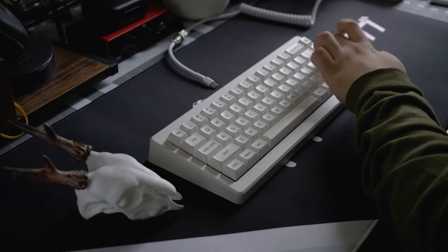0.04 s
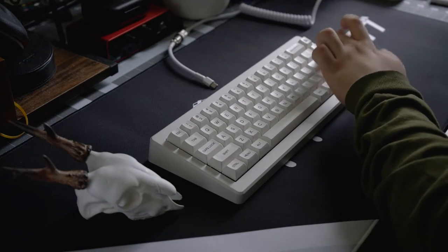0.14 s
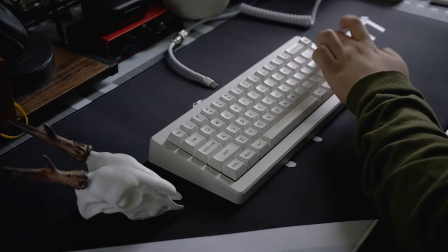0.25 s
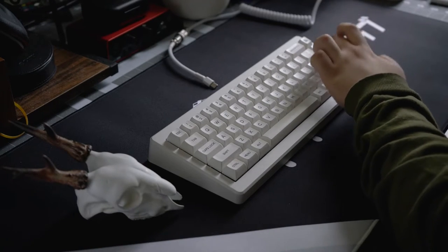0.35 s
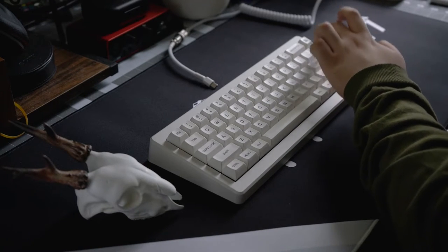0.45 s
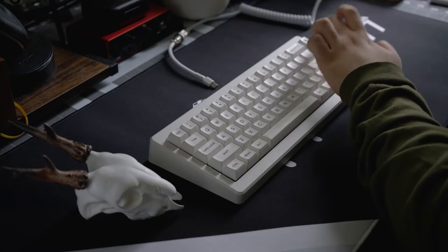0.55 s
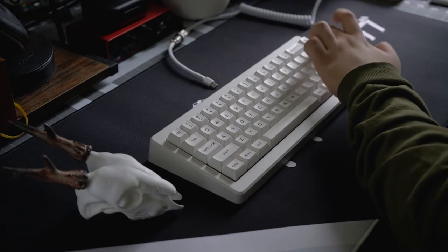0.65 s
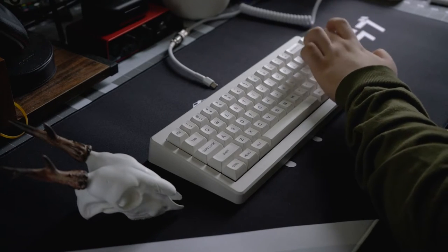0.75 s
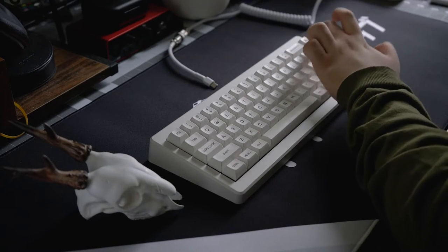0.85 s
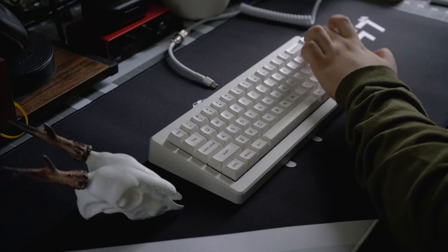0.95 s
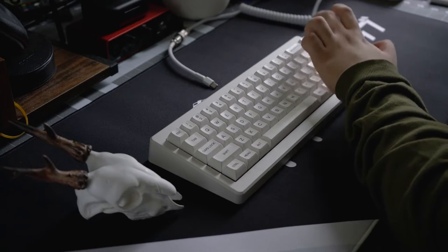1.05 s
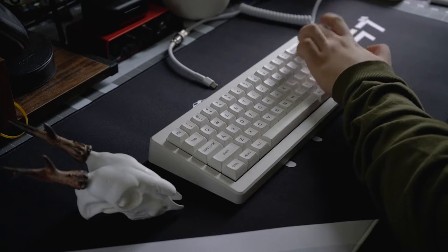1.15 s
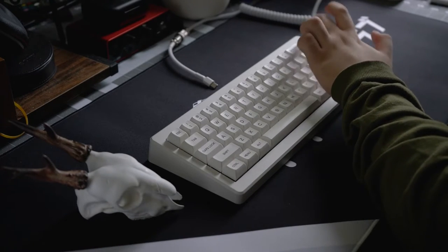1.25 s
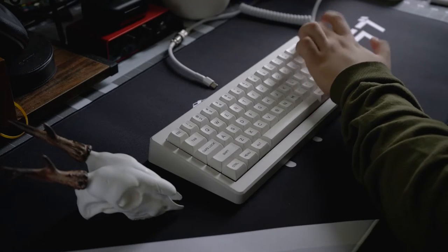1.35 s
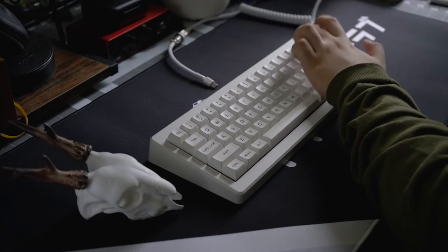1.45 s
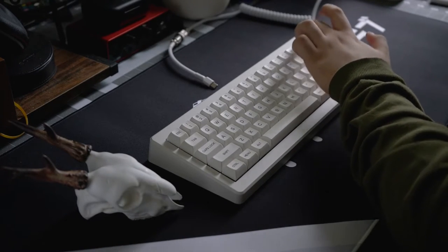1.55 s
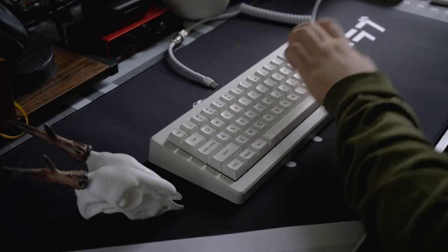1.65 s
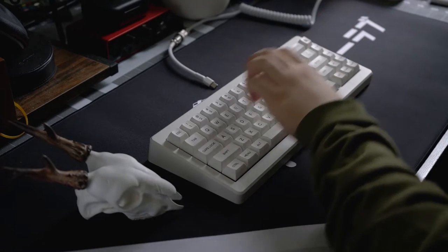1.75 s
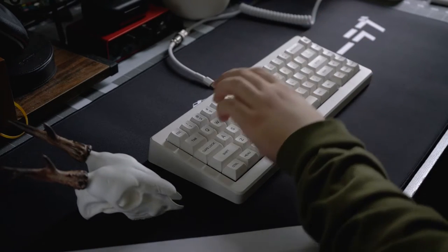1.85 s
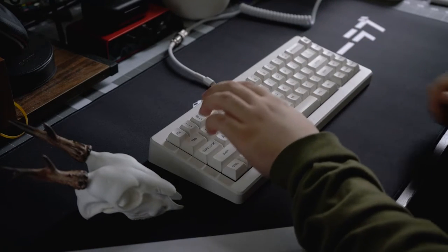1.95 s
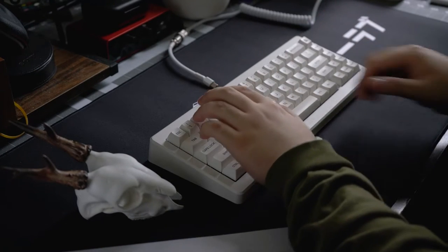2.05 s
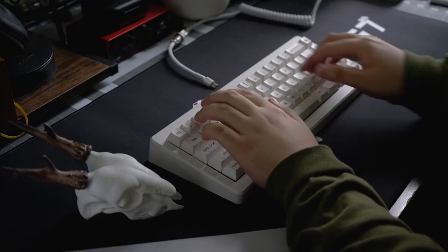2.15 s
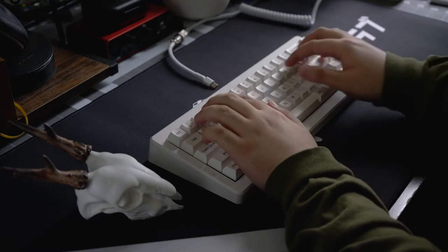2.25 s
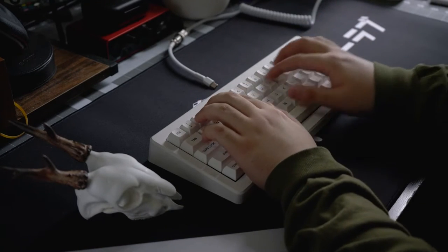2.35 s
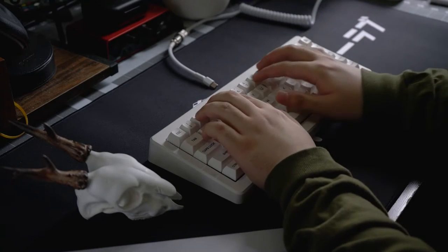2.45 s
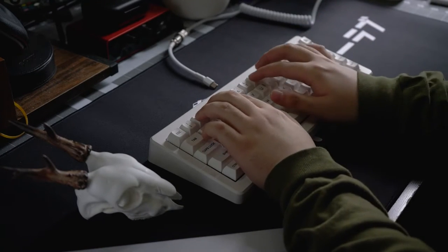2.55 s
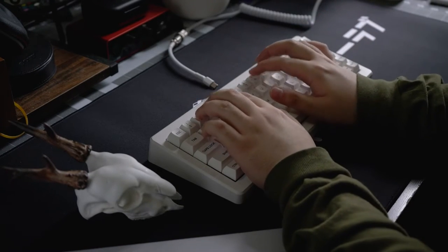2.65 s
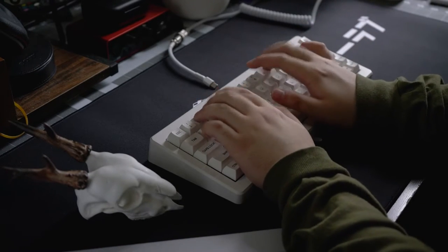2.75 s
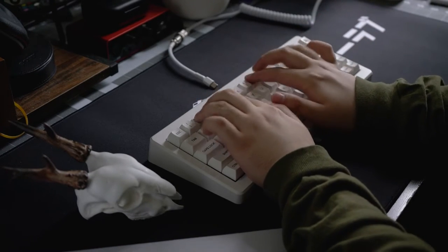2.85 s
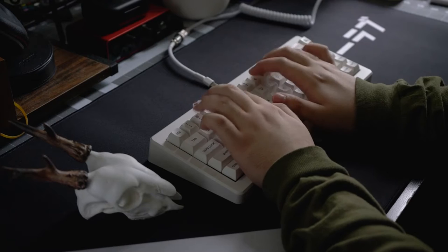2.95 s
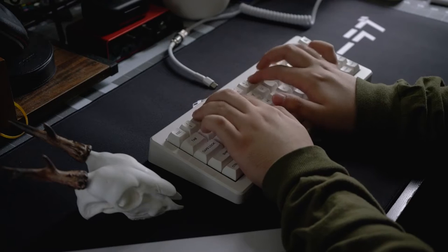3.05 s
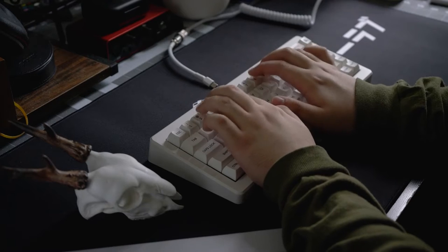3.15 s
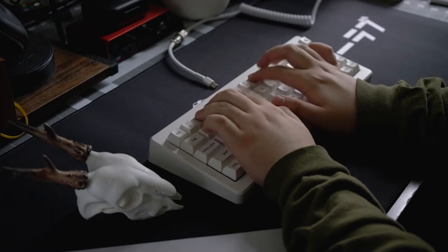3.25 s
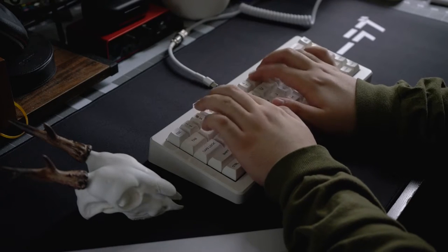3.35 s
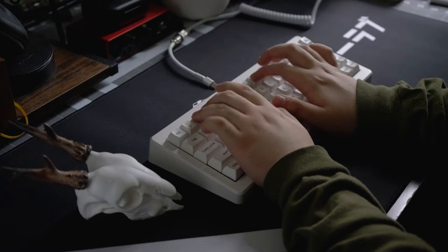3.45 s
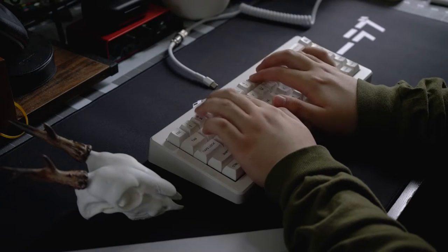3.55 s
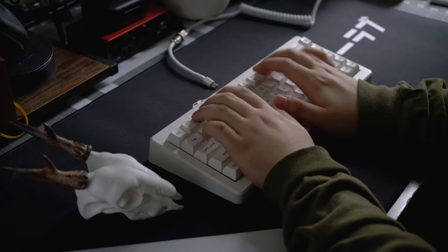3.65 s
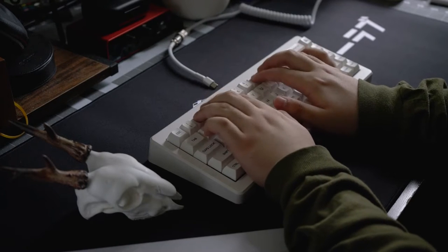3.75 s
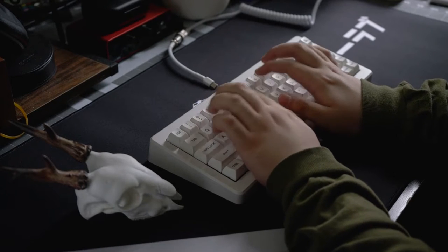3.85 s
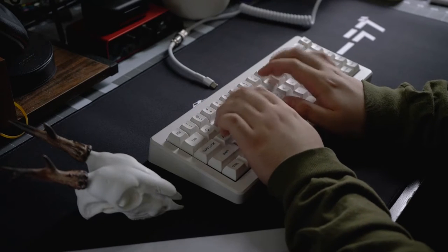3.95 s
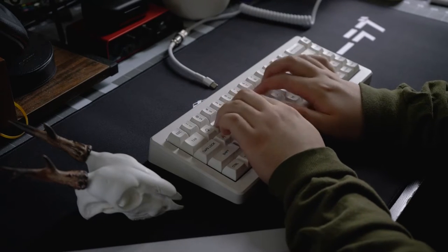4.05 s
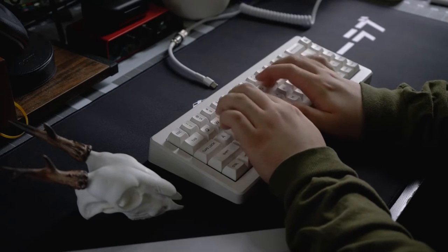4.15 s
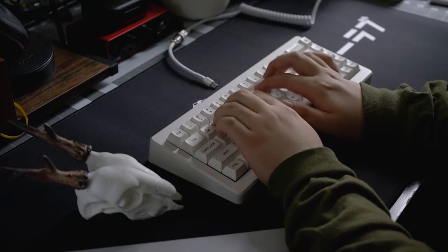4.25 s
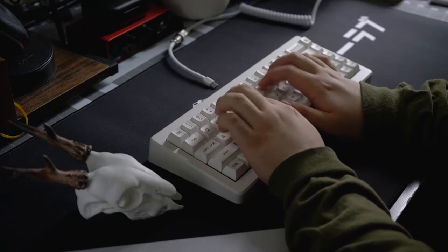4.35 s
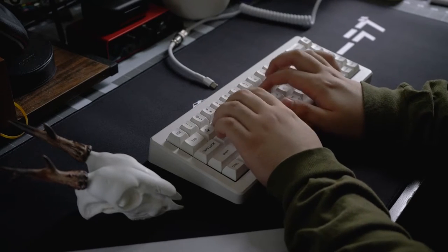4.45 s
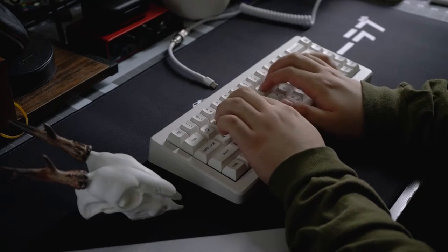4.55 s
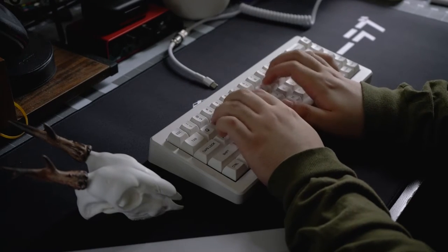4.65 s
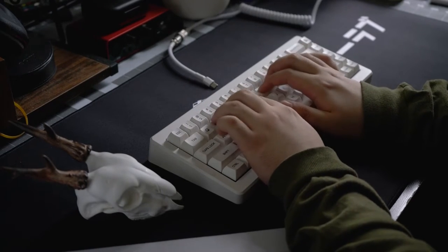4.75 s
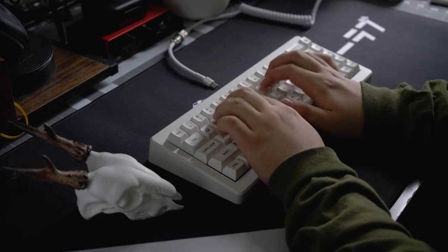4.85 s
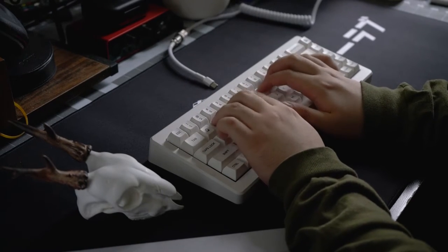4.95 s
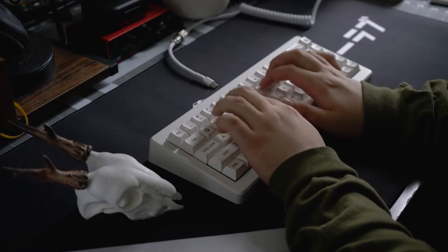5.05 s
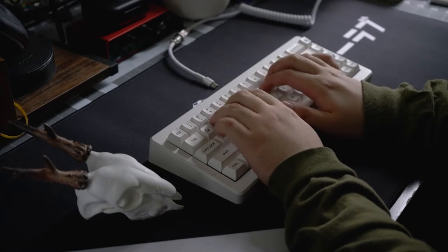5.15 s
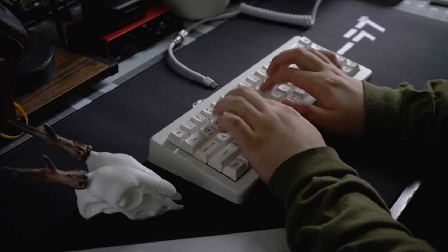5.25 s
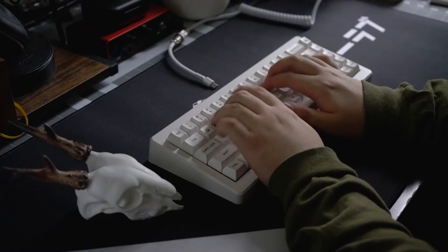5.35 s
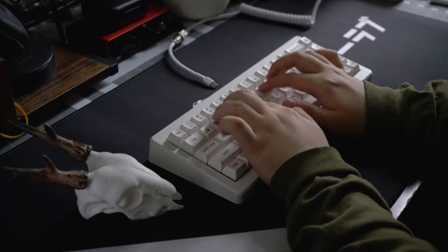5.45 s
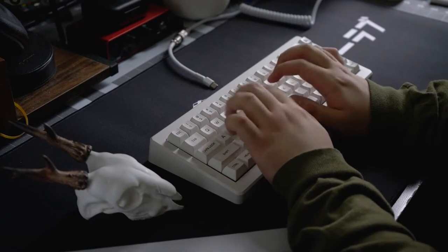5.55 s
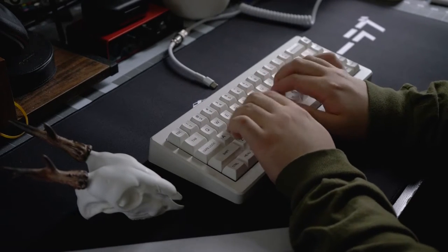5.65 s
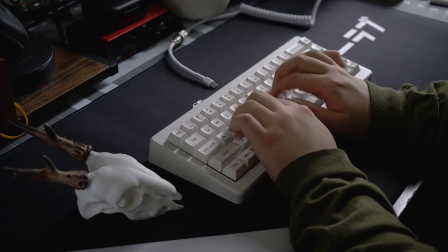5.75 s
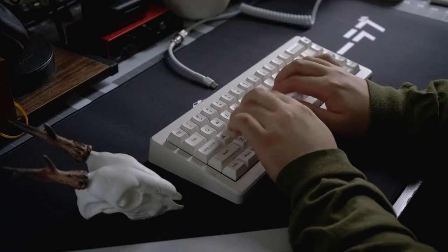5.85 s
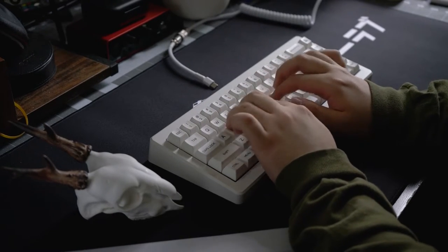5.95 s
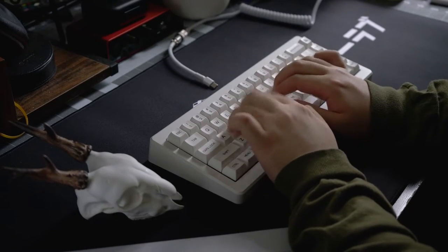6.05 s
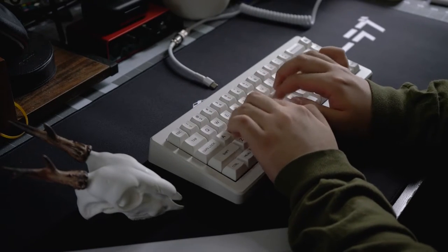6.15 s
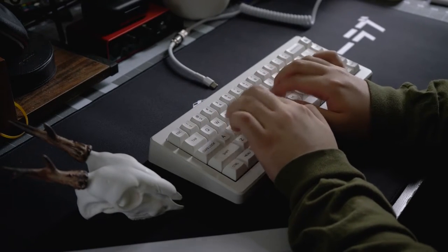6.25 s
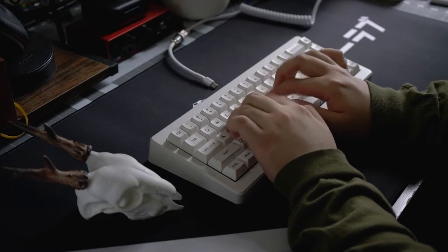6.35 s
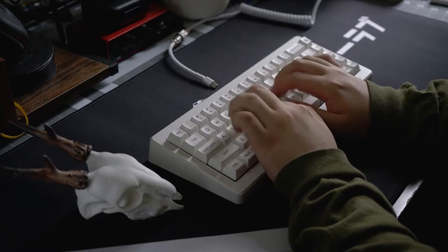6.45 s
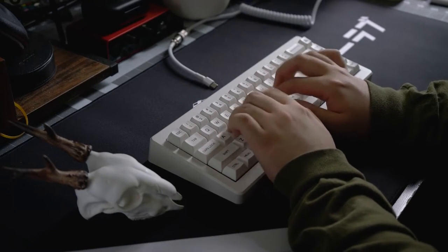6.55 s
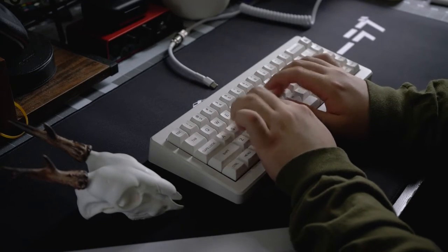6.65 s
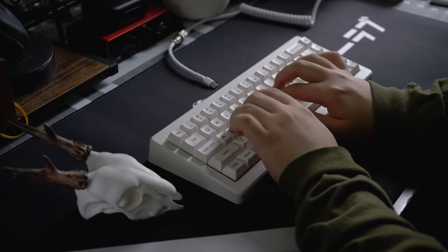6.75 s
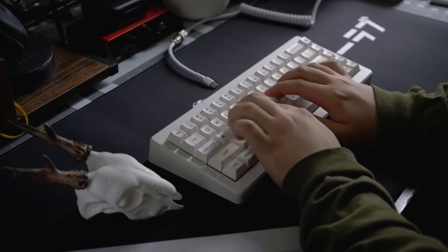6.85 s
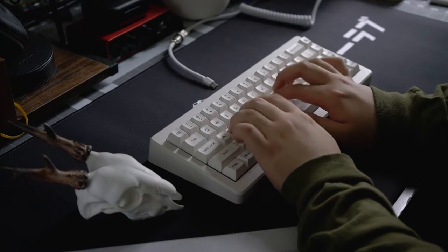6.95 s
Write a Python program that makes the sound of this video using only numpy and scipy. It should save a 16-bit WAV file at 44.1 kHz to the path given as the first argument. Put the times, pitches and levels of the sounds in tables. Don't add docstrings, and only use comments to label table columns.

```python
import sys
import numpy as np
from scipy import signal
from scipy.fft import rfft, irfft, next_fast_len
from scipy.io import wavfile
from scipy.ndimage import map_coordinates

SR = 44100
rng = np.random.default_rng(int(sys.argv[2]) if len(sys.argv) > 2 else 0)


def file_out(sig):
    cols = np.atleast_2d(sig).T
    lim = np.clip(cols, -1, 1)
    pcm = np.round(lim * 32767).astype(np.int16)
    wavfile.write(sys.argv[1], SR, pcm)


def invert_db(x):
    u = np.asarray(x, float) / 20
    return 10 ** u


N = 308700
LENGTH = 2048


def unit(x):
    return x / np.sqrt(np.mean(x ** 2) + 1e-20)


def energy_one(rows):
    return rows / np.linalg.norm(rows, axis=1, keepdims=True)


def along(points, hz):
    point_hz, value = np.transpose(points)
    return np.interp(np.log(hz + 1), np.log(point_hz + 1), value)


def filtered(x, response):
    n = x.shape[-1]
    padded = next_fast_len(n + min(n, 8192))
    spectrum = rfft(x, padded) * response(np.fft.rfftfreq(padded, 1 / SR))
    return irfft(spectrum, padded)[..., :n]


def resonances(peaks):
    def response(hz):
        total = 0
        for k, (centre, width, db) in enumerate(peaks):
            damping = 1j * hz * width
            total = total + (-1) ** k * invert_db(db) * damping / (centre * centre - hz * hz + damping)
        return total
    return response


def low_cut(x, edge_hz):
    b, a = signal.butter(7, edge_hz, "high", analog=True)
    return filtered(x, lambda hz: signal.freqs(b, a, hz)[1])


def place(times, rows):
    at = np.round(np.asarray(times) * SR).astype(int)[:, None] + np.arange(rows.shape[1])
    return np.bincount(at.ravel(), rows.ravel(), N + SR)[:N]


def wander(per_second):
    return map_coordinates(rng.standard_normal(200), [np.arange(N) * per_second / SR])


# freq_hz [Hz], level_db [dB per Hz]
AIR_SPECTRUM = [(12, -29.5), (20, 6.5), (36, -11.5), (90, -10.5), (330, -24.5), (1500, -37.5), (8410, -70),
                (9670, -53.5), (16000, -101)]
# freq_hz [Hz], width_hz [Hz], level_db [dB]
FAN_BAND = [(3000, 150, 2)]
# freq_hz [Hz], level_db [dB per Hz]
CLOTH_SPECTRUM = [(500, 1), (3000, 0), (7500, -9), (11500, -15.5), (13200, -32), (17000, -52)]
# start_s [s], level_db [dB]
SLEEVE_LEVEL = [(0, -63), (.62, -71.5), (1.3, -64.5), (1.599, -60.5), (1.901, -67), (2.101, -69),
                (2.849, -66.5), (4.05, -72), (4.5, -68), (5.7, -74.5), (7, -64)]


def background():
    air = unit(filtered(rng.standard_normal(N), lambda hz: invert_db(along(AIR_SPECTRUM, hz))))
    fan = unit(filtered(rng.standard_normal(N), resonances(FAN_BAND)))
    cloth = unit(filtered(rng.standard_normal(N), lambda hz: invert_db(along(CLOTH_SPECTRUM, hz))))
    rub = wander(25)
    sleeve_db = np.interp(np.arange(N) / SR, *np.transpose(SLEEVE_LEVEL))
    return invert_db(-54.5) * air + invert_db(-76 + 2.9 * rub[::-1]) * fan + invert_db(sleeve_db + 1.1 * rub) * cloth


# freq_hz [Hz], t60_s [s]
ROOM_DECAY = [(600, 0.52), (3000, 0.32), (12000, 0.19)]


def room(x):
    out, step = np.zeros(N + SR), SR // 4
    for i in range(0, N, step):
        hz, t, bins = signal.stft(rng.standard_normal(SR // 3), SR, nperseg=256)
        decay = invert_db(-60 * t / along(ROOM_DECAY, hz)[:, None])
        tail = signal.istft(bins * decay, SR, nperseg=256)[1]
        wet = signal.fftconvolve(x[i:i + step], tail / np.linalg.norm(tail))
        out[i + 130:][:len(wet)] += wet
    return out[:N]


# start_s [s, centre], length_s [s], pitch_hz [Hz], width_hz [Hz], level_db [dB]
BRUSHES = [
    (1.86, .08, 7450, 350, -75),
    (1.78, .17, 10500, 500, -73),
    (1.69, .14, 12900, 4800, -78),
    (1.61, .06, 6400, 700, -71),
    (1.94, .09, 2940, 130, -72),
    (2.33, .025, 14100, 2900, -83),
]


def brush():
    t, out = np.arange(N) / SR, 0
    for s, length, hz, width, db in BRUSHES:
        hiss = unit(filtered(rng.standard_normal(N), resonances([(hz, width, 0)])))
        snag_db = 1.5 * wander(18)
        out = out + invert_db(db + snag_db) * np.exp(-((t - s) / length) ** 2) * hiss
    return out


# start_s [s], level_db [dB]
DESK_THUMPS = [(0.158, -33.5), (0.3, -44), (0.456, -39.5), (0.721, -32.5), (1.275, -32.5), (1.4206, -40),
               (1.563, -40.5), (2.881, -40), (2.981, -63), (3.128, -57), (3.626, -40), (3.802, -58),
               (3.862, -65), (4.296, -46), (4.3458, -55), (4.471, -51), (4.562, -41), (5.249, -41.5),
               (5.4631, -54), (5.791, -53), (5.946, -39), (6.2, -48), (6.338, -42), (6.4, -42),
               (6.555, -53), (6.633, -53), (6.763, -41), (6.8658, -39), (6.955, -46)]


def desk():
    nudges = [(s, cap_db - 25) for s, _, cap_db, *_ in presses()]
    s, db = np.transpose(DESK_THUMPS + nudges)
    t = np.arange(2 * LENGTH) / SR
    hz = 62 * (1 + .1 * rng.standard_normal((len(s), 1)))
    swing = -np.cos(2 * np.pi * hz * t) * t / 0.017 * np.exp(1 - t / 0.0068)
    return place(s, invert_db(db + 7.5)[:, None] * swing)


def rings(modes, favoured_hz, push, unlike_db, swell_s):
    t = np.arange(LENGTH) / SR
    luck = rng.standard_normal((len(push), 2 * len(modes)))
    ring = 0
    for k, (hz, db, t60) in enumerate(modes):
        t60 = np.clip(t60, .004, .045)
        tuned_hz = hz * (1 + .012 * luck[:, 2 * k, None])
        scatter_db = unlike_db * luck[:, 2 * k + 1]
        place_db = 10 * np.exp(-((favoured_hz - hz) / (.1 * hz)) ** 2)
        decay = invert_db((db + scatter_db + place_db)[:, None] - 60 * t / t60)
        ring = ring + decay * np.sin(2 * np.pi * tuned_hz * t)
    ring = ring * (1 - np.exp(-t / swell_s))
    return energy_one(signal.fftconvolve(ring, push, axes=1)[:, :LENGTH])


def contacts(table, case_modes, cap_modes, stem, chatter_s, chatter_db, click_s, rise_s, unlike_db, snap_db):
    missing = 6 - len(table[0])
    s, case_db, cap_db, click_db, case_hz, cap_hz = np.pad(table, ((0, 0), (0, missing))).T
    t = np.arange(LENGTH) / SR
    noise = rng.standard_normal((len(s), 3, LENGTH))
    rise = 1 - np.exp(-t / rise_s)

    blow = t / rise_s * np.exp(1 - t / rise_s)
    bounces = noise[:, 0] ** 3 * rise * np.exp(-t / chatter_s)
    push = blow + invert_db(chatter_db) * bounces
    case = rings(case_modes, case_hz, push, unlike_db, swell_s=0.00061)
    cap = rings(cap_modes, cap_hz, push, unlike_db, swell_s=0.00018)

    snap = invert_db(snap_db) * (np.arange(LENGTH) == 2)
    spring = invert_db(-39.0 - 60 * t / 0.03)
    buzz = noise[:, 1] * rise * (np.exp(-t / click_s) + spring)
    burst = snap + buzz + invert_db(-7) * np.gradient(push, axis=1)
    click = energy_one(filtered(burst, stem(s, noise[:, 2, :1])))

    shake = noise[:, 2] * np.abs(noise[:, 0]) * rise * invert_db(-60 * t / 0.091)
    rattle = filtered(shake, resonances([(2440, 830, 0)]))
    mutter = filtered(shake, resonances([(960, 374, 0), (1450, 270, -2)]))
    cap = cap + invert_db(-17.5) * energy_one(rattle)
    case = case + invert_db(-10.0) * energy_one(mutter)

    sound = invert_db(case_db)[:, None] * case + invert_db(cap_db)[:, None] * cap + invert_db(click_db)[:, None] * click
    return place(s, invert_db(19.5) * sound)


def slides(table):
    t = np.arange(-400, 0) / SR
    scrape = rng.standard_normal((len(table), len(t))) * invert_db(60 * t / 0.014)
    scrape = filtered(scrape, resonances([(2500, 3100, -1.0), (10000, 3300, -4.5)]))
    return place(table[:, 0] + t[0], invert_db(table[:, 2, None] - 4) * energy_one(scrape))


# [dB, case over the usual]
FIRST_STROKES = [(2.8862, -22.5, -27.5, 2720, 1), (2.9, -27.5, -33, 2560, -7),
                 (2.9052, -22.5, -20.5, 2880, 2), (2.9831, -17.5, -23, 2770, 1),
                 (3.0853, -22, -23.5, 2600, -0.5), (3.094, -22.5, -24, 2600, -1),
                 (3.115, -25.5, -28.5, 2880, 0), (3.1322, -25, -28.5, 2930, -0.5),
                 (3.195, -22, -27, 2500, -1.5), (3.2686, -21.5, -24, 2520, -1),
                 (3.276, -22, -23.5, 2550, -4), (3.327, -28, -36, 2860, -3.5), (3.4009, -20, -24, 2540, -3),
                 (3.4535, -22, -24, 2540, -5), (3.4615, -24.5, -26.5, 2540, -3.5),
                 (3.502, -27, -28.5, 2830, -2), (3.5442, -24.5, -29, 2520, -1.5),
                 (3.6277, -17, -20.5, 2540, 2), (3.6323, -23.5, -23, 2620, -5),
                 (3.6863, -25, -26, 2850, -1), (3.7865, -25, -31, 2820, 0),
                 (3.8017, -22.5, -25, 2730, -1.5), (3.8615, -19, -23, 2540, 0.5)]
SECOND_STROKES = [(4.1017, -25.5, -38, 3420, 0), (4.1092, -24.5, -34, 3200, 0),
                  (4.1878, -24, -35, 3250, 0.82), (4.192, -27.5, -32.5, 2470, 1.3),
                  (4.197, -34, -37, 1880, 0.2), (4.2926, -25.5, -26, 3570, 0.59),
                  (4.2972, -24.5, -31, 2060, 1.1), (4.3143, -34, -38, 2410, 0),
                  (4.3358, -24.5, -37, 2960, 0), (4.346, -27, -30.5, 2400, 0.67),
                  (4.4062, -23, -20, 3560, 0), (4.4088, -24.5, -32, 3300, 0), (4.4646, -23, -25, 3860, 0),
                  (4.469, -26, -27, 3180, 0), (4.5607, -22.5, -30.5, 3780, 0), (4.6389, -45, -42, 1750, 0),
                  (4.854, -24, -27.5, 3630, 2), (4.8735, -25.5, -35, 3180, 0.35),
                  (5.0175, -27, -45, 3080, 0), (5.071, -27.5, -36, 3080, 0.29),
                  (5.227, -28, -28.5, 2800, 0), (5.2485, -20, -28.5, 3050, 0), (5.337, -25, -32, 3200, 0),
                  (5.433, -22, -26, 2190, 1.7), (5.4421, -23, -25, 3500, 0.89),
                  (5.4632, -16.5, -24, 3300, 2.9), (5.4693, -21.5, -32, 3180, 0),
                  (5.488, -30.5, -32, 2840, 0.23), (5.5495, -21, -28, 3220, 1.6)]
THIRD_STROKES = [(5.7426, -28, -34.5, 2930, 0.5), (5.7912, -22, -26, 3330, 2.5),
                 (5.8682, -23.5, -31, 2250, 1), (5.9464, -23.5, -32.5, 3230, 1),
                 (5.9846, -30.5, -34, 1880, 1.5), (6.0025, -24.5, -38, 2130, -1),
                 (6.081, -21.5, -29, 2010, 2), (6.1435, -22.5, -33, 2250, -3.5),
                 (6.164, -28, -41, 2340, -2.5), (6.1995, -16, -27.5, 1690, -5),
                 (6.2126, -25.5, -35, 2130, -11), (6.295, -21, -26.5, 1630, 1.5),
                 (6.3386, -23.5, -31.5, 2500, 0), (6.4043, -27, -30, 3160, 4),
                 (6.4196, -15, -28.5, 1880, -3.5), (6.5083, -19.5, -29.5, 1880, 2.5),
                 (6.5558, -20, -29, 3030, -2), (6.5699, -27, -35, 1870, -9), (6.6115, -28.5, -39, 3340, 1),
                 (6.6339, -17, -27.5, 1870, -2.5), (6.7195, -20, -26.5, 1680, 1.5),
                 (6.7615, -18, -26, 3180, 1.5), (6.7818, -24.5, -33.5, 2320, -3),
                 (6.838, -20.5, -28.5, 1880, 1.5), (6.8487, -36, -45, 2050, 4),
                 (6.8668, -15, -25, 1870, -6), (6.8778, -28.5, -39, 2400, -5.5),
                 (6.9572, -18.5, -26, 2020, 3.5)]
# [Hz, favoured]
HAND_PLACES = [
    (-29, 1310),
    (-31, 950),
    (-29.5, 1000),
]


def presses():
    rows = []
    for run, (case_db, case_hz) in zip((FIRST_STROKES, SECOND_STROKES, THIRD_STROKES), HAND_PLACES):
        s, cap_db, click_db, plate_hz, extra_db = np.transpose(run)
        excess_db = cap_db + 38.5
        body_db = case_db + extra_db + 0.28 * excess_db
        rows.append(np.transpose([s, body_db, cap_db, click_db, case_hz + 0 * s, plate_hz]))
    return np.vstack(rows)


# start_s [s], case_db [dB], cap_db [dB]
FIRST_REBOUNDS = [(2.9467, -35.5, -35.5), (2.9965, -32, -40), (3.0188, -31.5, -46), (3.042, -35, -38.5),
                  (3.0485, -40, -52), (3.1664, -30, -39), (3.233, -30.5, -39.5), (3.2385, -35, -39.5),
                  (3.313, -34, -38), (3.319, -27, -31.5), (3.3554, -34, -39.5), (3.37, -31, -38),
                  (3.4115, -26.5, -42), (3.4393, -28.5, -42), (3.5242, -28, -34), (3.5295, -34, -37),
                  (3.5395, -26, -38), (3.5502, -35, -36), (3.591, -29, -40), (3.681, -29, -42),
                  (3.7198, -34, -36.5), (3.7276, -33.5, -58), (3.7502, -30, -43), (3.7607, -31, -37),
                  (3.7906, -29, -29), (3.9033, -31, -40.5), (3.9113, -43, -40), (3.9502, -31.5, -39),
                  (3.9741, -35.5, -40)]
SECOND_REBOUNDS = [(4.223, -29.5, -40), (4.2301, -34, -38.5), (4.3107, -24.5, -31), (4.3757, -28, -31.5),
                   (4.429, -28.5, -28.5), (4.4376, -32, -42), (4.5213, -28.5, -33.5), (4.5268, -32, -38),
                   (4.611, -31, -38.5), (4.6361, -43, -31.5), (4.646, -28, -30.5), (4.6795, -37, -48),
                   (4.709, -29, -29.5), (4.7415, -30.5, -39), (4.751, -36, -50), (4.7658, -26.5, -31.5),
                   (4.8059, -32.5, -34), (4.8236, -30.5, -30), (4.8354, -38, -32), (4.9354, -35, -40.5),
                   (4.951, -32.5, -50), (4.9781, -29.5, -41)]
THIRD_REBOUNDS = [(5.009, -30, -39), (5.0144, -43, -29.5), (5.031, -33, -34), (5.103, -31, -33.5),
                  (5.1343, -30, -38), (5.1567, -31.5, -42), (5.1827, -28.5, -39.5), (5.215, -29.5, -27.5),
                  (5.233, -29, -40), (5.26, -29.5, -38), (5.282, -32.5, -36), (5.3481, -30.5, -39),
                  (5.37, -30, -34.5), (5.398, -28, -37), (5.565, -49, -40), (5.5755, -31.5, -44),
                  (5.592, -37, -33.5), (5.6039, -32, -35), (5.6103, -28.5, -38), (5.6452, -31.5, -38)]
LAST_REBOUNDS = [(5.767, -47, -44), (5.781, -38, -32), (5.84, -36, -44.5), (5.898, -28, -36),
                 (5.9056, -31.5, -38), (5.9585, -30.5, -39), (5.9985, -38, -46), (6.051, -32, -40),
                 (6.06, -32, -47), (6.0989, -29, -36), (6.1077, -31, -37), (6.1796, -29, -33),
                 (6.245, -31.5, -39), (6.259, -36, -48), (6.3066, -33, -44), (6.3194, -30.5, -36),
                 (6.447, -30, -40), (6.464, -37, -43), (6.533, -30, -37), (6.5421, -32.5, -43),
                 (6.6197, -32, -38), (6.6667, -31.5, -40), (6.708, -41, -47), (6.7558, -34, -47),
                 (6.94, -29, -36), (6.9751, -30.5, -33), (6.982, -37, -40)]
# [Hz, favoured]
REBOUND_COLOURS = [
    (-1, 1290),
    (-3, 1074),
    (-3.5, 1020),
    (-4, 1070),
]


def returns():
    rows = []
    words = (FIRST_REBOUNDS, SECOND_REBOUNDS, THIRD_REBOUNDS, LAST_REBOUNDS)
    for word, (click_db, case_hz) in zip(words, REBOUND_COLOURS):
        for s, case_db, cap_db in word:
            rows.append((s, case_db, cap_db, cap_db + click_db, case_hz))
    return rows


# pitch_hz [Hz], width_hz [Hz], level_db [dB]
STEM_MODES = [(4080, 200, -16), (7100, 990, 3), (10570, 2100, -5.5), (9600, 690, 14), (14200, 1200, -27)]
# start_s [s], pitch_hz [Hz]
STEM_PITCH = [(2.9, 9860), (3.5, 9800), (4.6, 9600), (5.4, 9600), (5.8, 9970), (6.9, 10000)]


def typed_stem(s, luck):
    main_hz = np.interp(s, *np.transpose(STEM_PITCH))[:, None]
    size = STEM_MODES[3][0] / main_hz + .025 * luck
    return lambda hz: resonances(STEM_MODES)(hz * size)


# start_s [s], case_db [dB], cap_db [dB], click_db [dB]
EDGE_STROKES = [
    (0.1572, -24, -23.5, -25),
    (0.3012, -31.5, -26.5, -30.5),
    (0.455, -30, -24.5, -28.5),
    (0.7164, -23, -20, -21),
    (0.8663, -28, -27.5, -31),
    (1.0242, -28, -27.5, -28),
    (1.2714, -23, -27.5, -14.5),
    (1.4175, -25.5, -30.5, -17.5),
    (1.56, -26, -37.5, -16.5),
]
# start_s [s], case_db [dB], cap_db [dB], click_db [dB]
EDGE_REBOUNDS = [
    (0.2314, -35, -39, -39.5),
    (0.3844, -32.5, -41, -37.5),
    (0.5468, -36.5, -39, -42),
    (0.7919, -32.5, -39.5, -37),
    (0.9449, -35.5, -42.5, -37),
    (1.1094, -34.5, -43, -39),
    (1.3422, -41.5, -41.5, -39.5),
    (1.494, -45, -45, -43.5),
    (1.6565, -43.5, -49, -44.5),
]
# pitch_hz [Hz], level_db [dB], t60_s [s]
CASE_UNDER_FIRST = [(988, 10, 0.013), (1380, -1, 0.014), (1780, -1.5, 0.022)]
CASE_UNDER_SECOND = [(997, 6, 0.016), (1350, 2, 0.014), (1480, 1.5, 0.015)]
CASE_UNDER_CORNER = [(1008, 0.5, 0.021), (1372, -5, .0145), (1490, 2, 0.017), (1860, -8.5, 0.027)]
# pitch_hz [Hz], level_db [dB], t60_s [s]
PLATE_UNDER_FIRST = [(1920, -6.5, 0.023), (2590, 0.5, 0.02), (3000, 5, 0.011), (3630, 2.5, 0.013),
                     (4110, 6.5, 0.014), (4340, -10, 0.023)]
PLATE_UNDER_SECOND = [(2016, -16, 0.027), (2540, 3.5, .0135), (2860, -2.5, 0.019), (3640, 7.5, 0.0091),
                      (4040, 8, 0.0083)]
PLATE_UNDER_CORNER = [(2596, -7.5, 0.018), (3400, -4, 0.011), (3815, 1.5, 0.0067)]
# pitch_hz [Hz], width_hz [Hz], level_db [dB]
STEM_OF_FIRST = [(6460, 320, -6.5), (7560, 840, -9.5), (9400, 570, -8.5), (10200, 420, -0.5),
                 (11100, 530, -6.5), (13700, 950, -17)]
STEM_OF_SECOND = [(5800, 190, -11), (6750, 730, -8.5), (7940, 730, -15), (9510, 223, 1), (11050, 390, -4.5),
                  (13150, 720, -14)]
STEM_OF_CORNER = [(6300, 450, -9), (7790, 440, -11.5), (9050, 430, -4), (10450, 430, -1),
                  (11400, 690, -0.5), (13010, 730, -24), (14200, 1500, -24.5)]


def edge_keys():
    out = 0
    bodies = [(CASE_UNDER_FIRST, PLATE_UNDER_FIRST, STEM_OF_FIRST),
              (CASE_UNDER_SECOND, PLATE_UNDER_SECOND, STEM_OF_SECOND),
              (CASE_UNDER_CORNER, PLATE_UNDER_CORNER, STEM_OF_CORNER)]
    for k, (case, cap, stem) in enumerate(bodies):
        own = slice(3 * k, 3 * k + 3)
        ring = lambda s, luck: resonances(stem)
        down = contacts(EDGE_STROKES[own], case, cap, ring, chatter_s=0.00043, chatter_db=-29.5,
                        click_s=.0013, rise_s=.00004, unlike_db=1.0, snap_db=18)
        up = contacts(EDGE_REBOUNDS[own], case, cap, ring, chatter_s=0.0028, chatter_db=-12,
                      click_s=0.0031, rise_s=.0001, unlike_db=1.5, snap_db=11.5)
        out = out + down + up
    return out


# pitch_hz [Hz], level_db [dB], t60_s [s]
CASE_MODES = [(771.4, 14, 0.021), (1009.5, 10.5, 0.017), (1305, 13.5, 0.014), (1453, -3.5, 0.017)]
# pitch_hz [Hz], level_db [dB], t60_s [s]
PLATE_MODES = [(1880, -1.5, 0.014), (2147, -6, 0.017), (2540, 4, 0.0091), (2892, 3.5, 0.0079),
               (3180, 3, 0.009), (3594, 5.5, 0.0042)]
# start_s [s], case_db [dB], cap_db [dB], click_db [dB]
EDGE_ROCKING = [
    (0.3217, -59, -48, -53),
    (0.5517, -48, -46, -45),
    (0.1545, -53, -41, -48),
    (1.1154, -45.5, -52.5, -42.5),
]
# start_s [s], case_db [dB], cap_db [dB], click_db [dB]
TYPING_ROCKING = [(2.9802, -41, -36, -41), (3.0206, -38, -51, -40), (3.0538, -35, -49, -57.0),
                  (3.0571, -53, -52, -60.0), (3.1705, -54, -41, -46), (3.1765, -45.0, -52.0, -66.0),
                  (3.1817, -40, -43, -42.0), (3.2287, -34, -54.0, -44.0), (3.3056, -44, -51, -70),
                  (3.5325, -45, -44, -41), (3.597, -42, -49, -46), (3.6563, -50, -47, -60),
                  (3.6707, -42, -39, -44), (3.7559, -36.5, -47, -47), (3.7727, -40, -55, -53),
                  (3.9203, -32, -43, -45), (3.931, -42, -49, -49.0), (3.957, -33, -45, -43.0),
                  (3.7533, -50, -43, -42), (4.0994, -38, -62, -50), (4.2341, -58, -55, -41),
                  (4.3332, -40, -55, -45.0), (4.4468, -36, -46, -45), (4.5495, -49, -49, -43),
                  (4.6321, -42, -48, -51.0), (4.6399, -27, -26.5, -32.5), (4.6903, -37.5, -43, -50.0),
                  (4.154, -43, -52, -54), (4.7521, -44, -51, -46.0), (4.7721, -31.5, -40, -42),
                  (4.9538, -48, -40, -45), (4.9184, -35.5, -46, -46), (4.9815, -48, -44, -41),
                  (5.0419, -38, -41.0, -56.0), (5.0986, -42, -42, -51.0), (5.2753, -37, -31, -52),
                (5.4051, -36, -52, -47.0), (5.4281, -40, -58, -47), (5.453, -32, -44, -55.0),
                (5.4858, -29, -33, -58), (5.5072, -47, -53, -58.0), (5.5129, -43, -55, -62.0),
                (5.5192, -54, -57, -66.0), (5.5303, -56, -57, -70.0), (5.5585, -38, -49, -59),
                (5.6518, -39, -54, -43.5), (5.7617, -39, -48, -55), (5.7672, -33, -31.5, -51),
                (5.9406, -61, -58, -54), (5.9785, -51, -47, -72.0), (5.9892, -35, -37, -42.0),
                (6.016, -51, -53, -43), (6.0259, -54, -54, -64.0), (6.2046, -45, -42, -37),
                (6.1378, -46, -59.0, -59.0), (6.174, -46, -53, -66), (6.182, -49, -39, -41),
                (6.3036, -42, -51, -53.0), (6.3335, -34, -46, -48), (6.5444, -32, -49, -46),
                (6.6074, -43.0, -42.0, -54.0), (6.713, -53, -60, -59.0), (6.7295, -37, -47, -49.0),
                (6.7402, -54, -51, -57.0), (6.8734, -53, -41, -43), (6.8929, -51, -52, -60.0),
                (4.5693, -37, -53, -55), (6.9437, -33, -45.0, -47)]


def keys():
    down = presses()
    typed = contacts(down, CASE_MODES, PLATE_MODES, typed_stem, chatter_s=0.0011, chatter_db=-9.0,
                     click_s=0.0013, rise_s=.00005, unlike_db=3, snap_db=12)
    loose = contacts(returns(), CASE_MODES, PLATE_MODES, typed_stem, chatter_s=0.003, chatter_db=-11.5,
                     click_s=0.0015, rise_s=.00005, unlike_db=5.5, snap_db=4)
    rocking = EDGE_ROCKING + TYPING_ROCKING
    ticks = contacts(rocking, CASE_MODES, PLATE_MODES, typed_stem, chatter_s=0.0014, chatter_db=-16.5,
                     click_s=0.00077, rise_s=.00005, unlike_db=4.0, snap_db=9)
    scrapes = slides(np.array([row[:3] for row in [*down, *EDGE_STROKES]]))
    typing = low_cut(typed + loose + ticks + scrapes, edge_hz=677)
    edge = edge_keys()
    mat = filtered(edge, resonances([(500, 154, -6.5)]))
    dull = mat - low_cut(mat, edge_hz=600)
    return typing + low_cut(edge, edge_hz=890) + dull


def scene():
    dry = keys()
    return (dry + invert_db(-19.0) * room(dry) + desk() + brush() + background())[None]


def top_cut(x):
    return signal.sosfilt(signal.butter(12, 16990, fs=SR, output="sos"), x)


def record(dry):
    top = lambda hz: 1 / (1 + (hz / 15800) ** 60)
    mix = filtered(dry, top)
    return top_cut(mix)


dry = scene()
out = record(dry)
file_out(out)
```